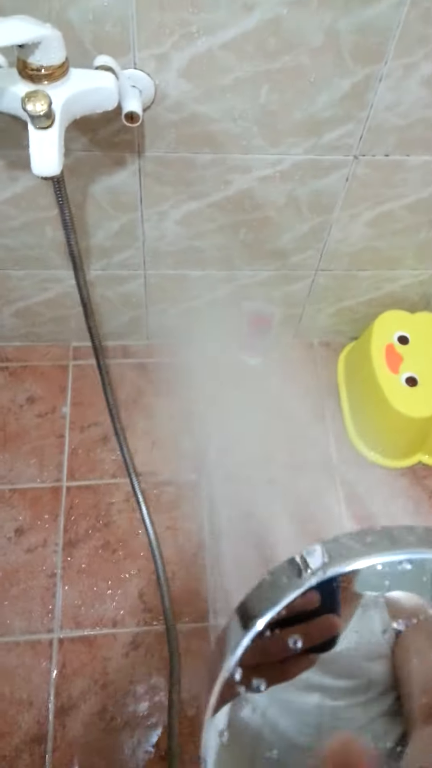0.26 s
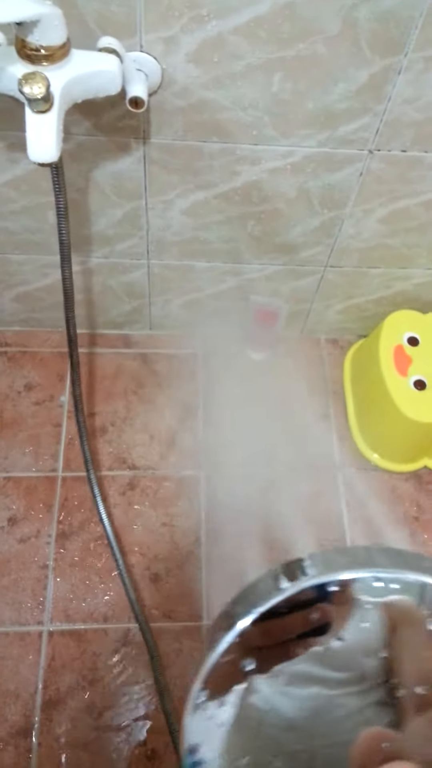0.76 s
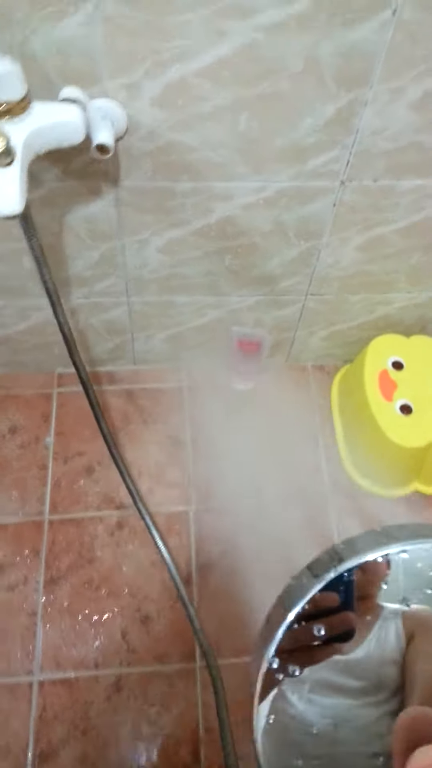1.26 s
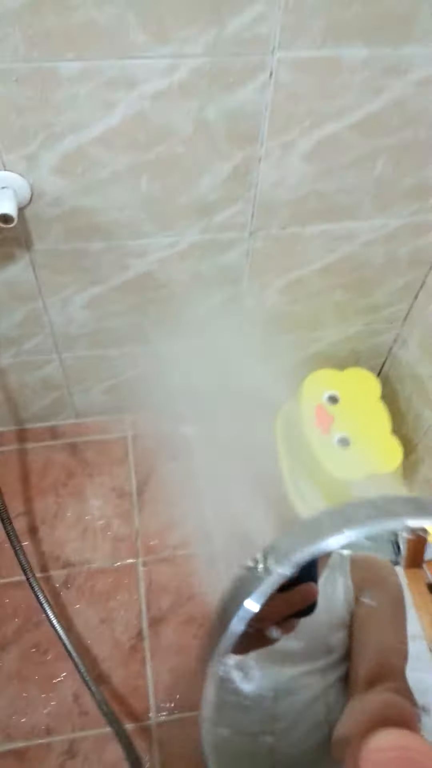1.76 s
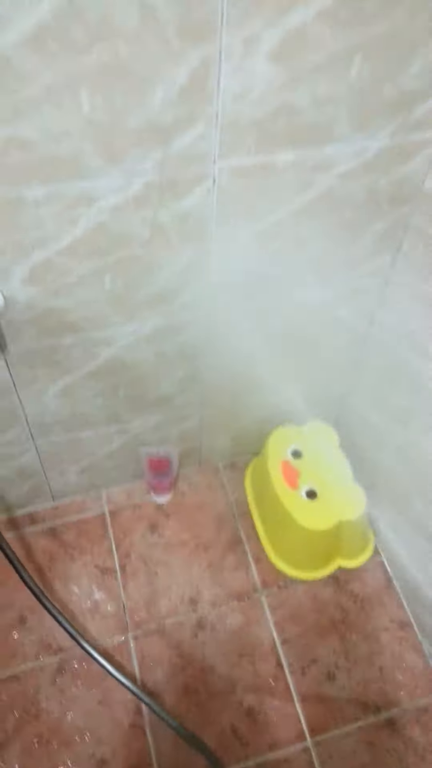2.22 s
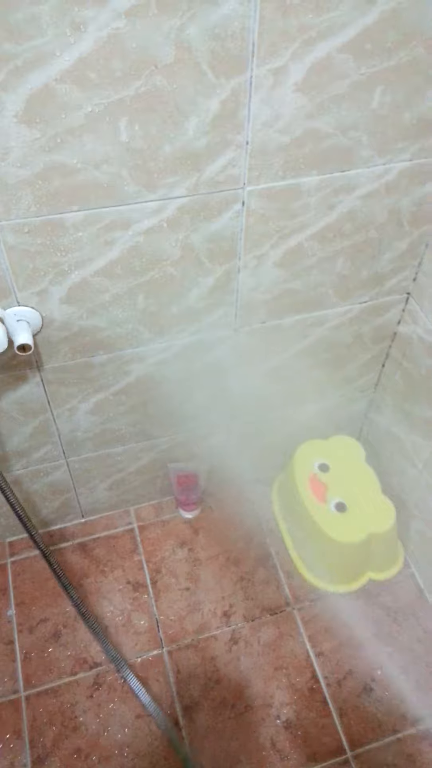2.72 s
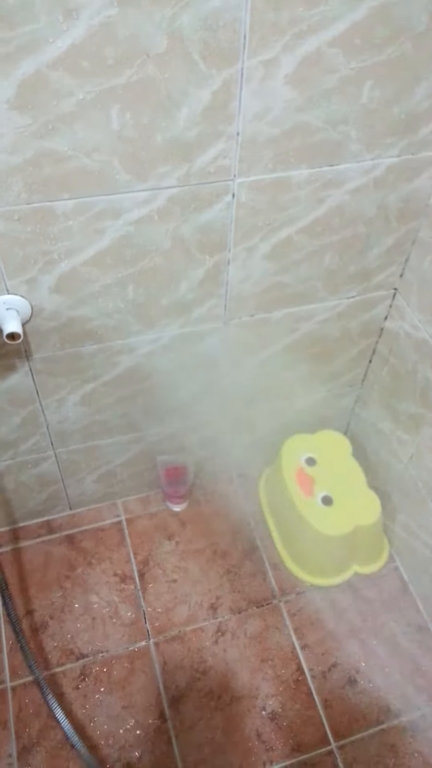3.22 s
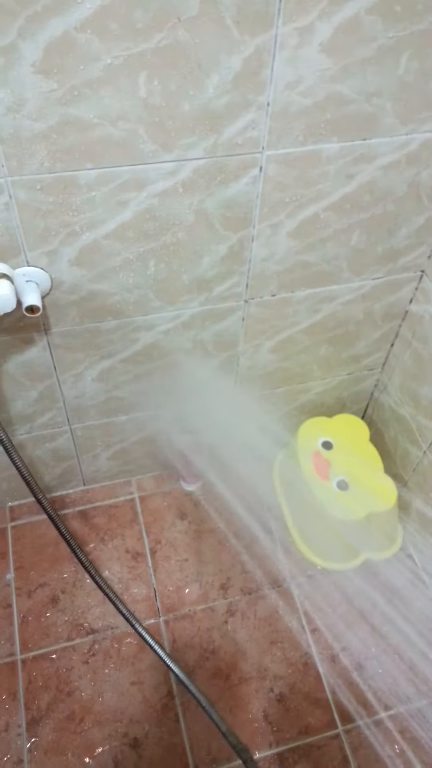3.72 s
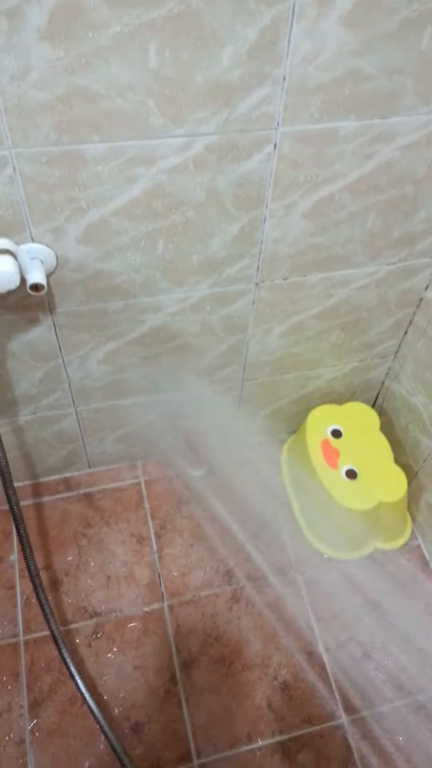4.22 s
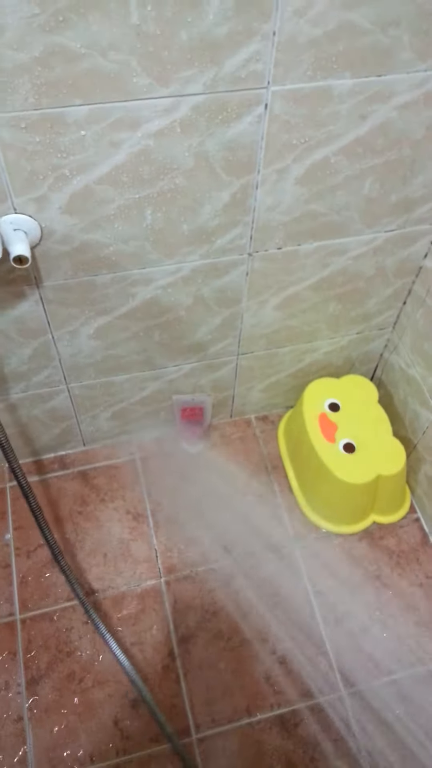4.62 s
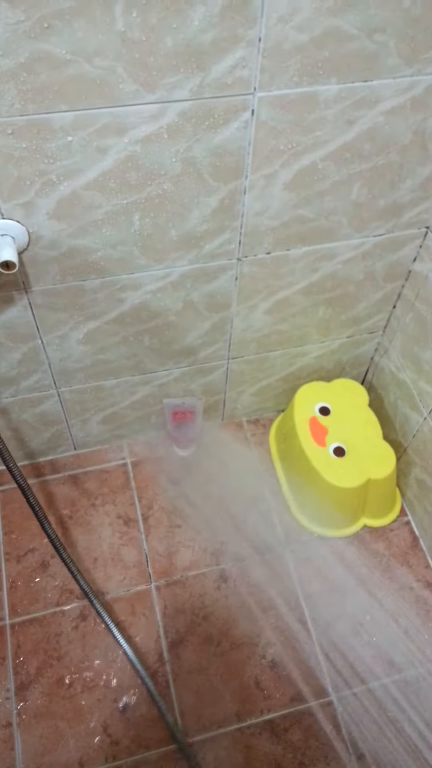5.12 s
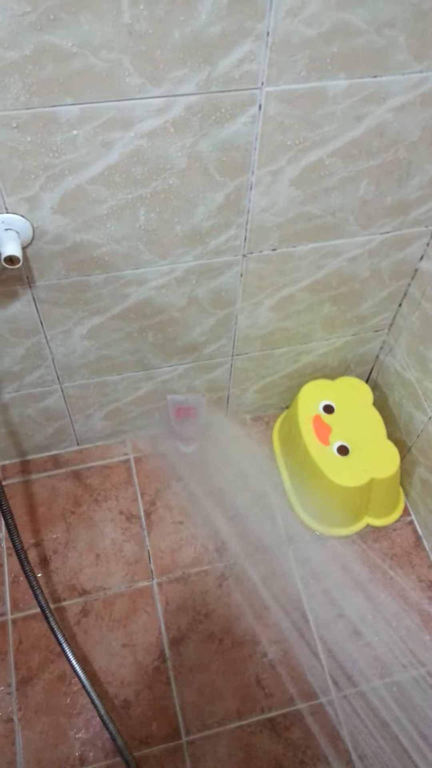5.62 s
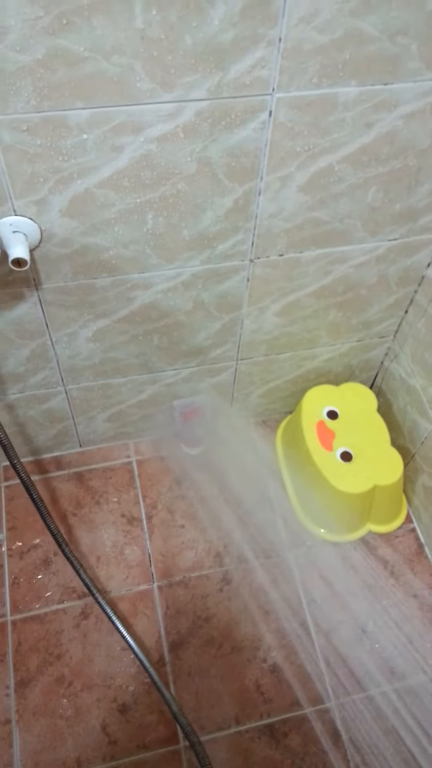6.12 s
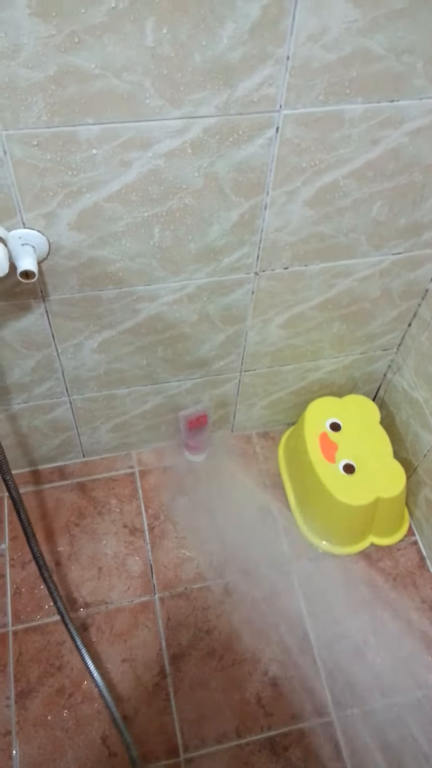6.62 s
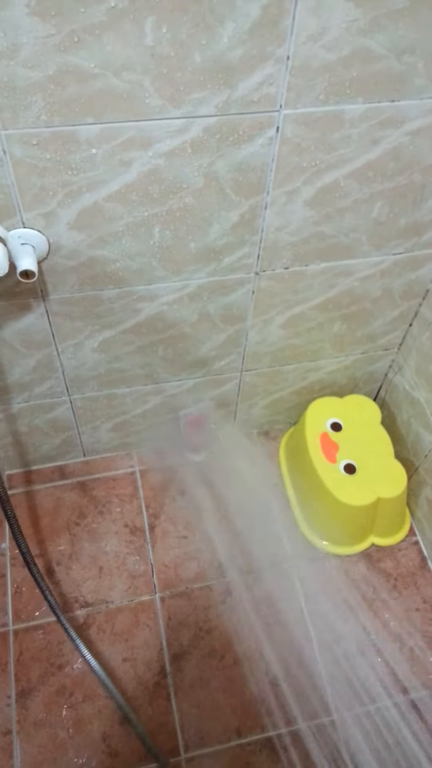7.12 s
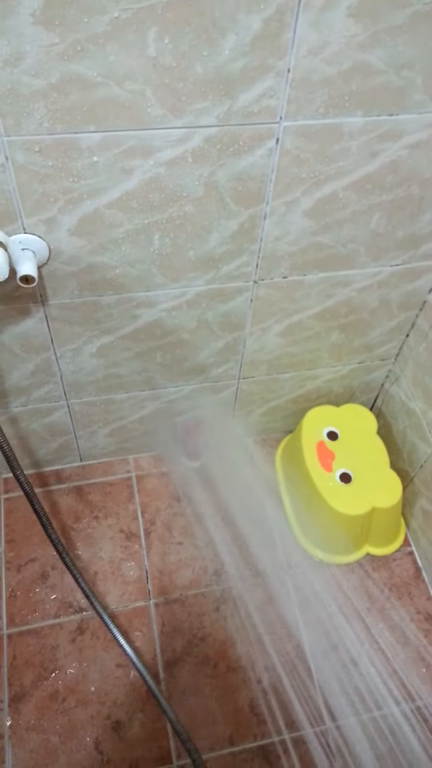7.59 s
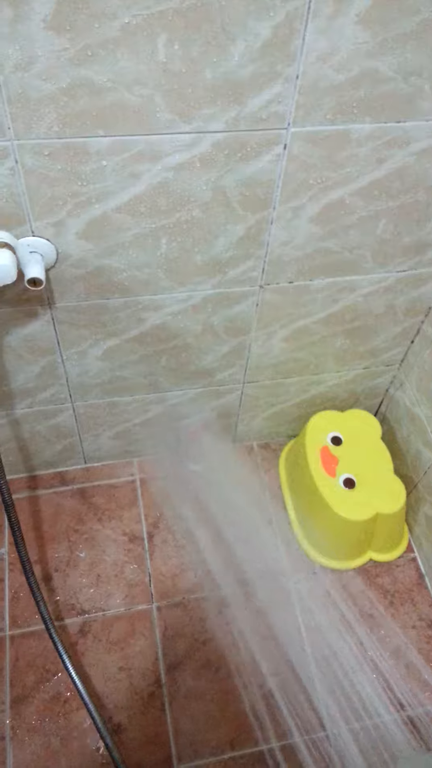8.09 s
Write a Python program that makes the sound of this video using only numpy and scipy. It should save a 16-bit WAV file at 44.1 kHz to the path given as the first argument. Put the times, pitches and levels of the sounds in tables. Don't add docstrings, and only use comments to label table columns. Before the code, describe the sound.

A hand shower hisses over bathroom tile, swelling and dipping, with one very loud sharp plastic snap partway, then a fuller steady spray.

```python
import sys
import numpy as np
from scipy import signal
from scipy.fft import rfft, irfft, next_fast_len
from scipy.io import wavfile
from scipy.ndimage import uniform_filter1d

SR = 44100
rng = np.random.default_rng(int(sys.argv[2]) if len(sys.argv) > 2 else 0)


def persist_wave(psi):
    counts = np.round(np.clip(psi, -1, 1) * 32767).astype(np.int16)
    wavfile.write(sys.argv[1], SR, np.atleast_2d(counts).T)


def natural_amplitude(level_db):
    exponent = np.asarray(level_db, float) / 20
    return 10 ** exponent


N = 368235

# (time [s], splash level [dB], drumming over splash [dB], body over splash [dB],
# fizz over splash [dB], low whistle [dB], high whistle [dB], lean to the left [dB])
SWEEP = [(0.0, -27.5, -6.5, -5, -4, -16, -6, -2.5), (0.11, -29, -6.5, -3, -3.5, -23, 1, -1.5),
         (0.2, -26, -9.5, -6, -5, -33, -11, -1.5), (0.34, -27, -6.5, -5.5, 0.5, -30, -1, -1),
         (0.44, -22.5, -15, -10.5, -4.5, -23.0, -18, -1.5),
         (0.49, -21.5, -12.5, -9.5, -3.0, -15, -10.5, -2), (0.63, -19.5, -15, -10, -5.5, -10, -14, -0.5),
         (0.78, -20, -11.5, -7, -4, -10, -24, -0.5), (0.9, -24.0, -9, -10, -2.5, 0, -14, -1),
         (0.96, -23.5, -15.5, -11.5, -5.5, 1, -13, -1), (1.03, -17, -15.5, -10.5, -6.5, -20, -46, -1.5),
         (1.26, -25.5, -12, -10, -3, 4, -7, 0.0), (1.33, -25.5, -9.5, -6, -4.0, -6, -6, -3),
         (1.4, -18.5, -11.5, -7.5, -5, -12, -14, -0.5), (1.45, -22.5, -10.0, -6, -0.5, -9, -18, -0.5),
         (1.52, -17.5, -10.5, -9.5, -6.5, 5, -2, -1.5), (1.61, -16, -7.5, -4.5, -4.5, -9, -29, -0.5),
         (1.73, -22, -9, -3.5, -7, -9, -15, -1.5), (1.87, -25, -11.5, -7.5, -6, -13, -17, -1.5),
         (2.03, -27.5, -9, -4, -4.5, -13.0, -12, -2), (2.12, -30.5, -6, -1.5, -1.5, -6.0, 8, -2.5),
         (2.22, -27, -7.5, -6.5, -4.5, 9, -6, -2), (2.3, -25, -12.5, -8, -8.5, -2, -2.0, -2),
         (2.36, -28.5, -7, -6, -3, 7, 7, -2), (2.46, -27, -12.5, -5.5, -5, -4, -2, -1),
         (2.62, -25.5, -10, -7.5, -6.5, -5, -2, 0.5), (2.77, -28.5, -8.5, -5, -3, -10, -6, -2.5),
         (3.04, -28.5, -6.5, -4.5, -4, -17, -6, 6), (3.12, -27, -10.5, -7.5, -6.5, -7, -12, -2.5),
         (3.18, -28, -6, -7.5, -3.5, 1.5, 1, 0.5), (3.26, -31, -9.5, -9, -4, 4, 2, -1),
         (3.33, -29, -4, -5, -4, 2.5, -9, 2), (3.66, -34, 3.5, 2, -1, -7, -10, -11),
         (3.76, -29.5, -8, -8.5, -4, -16, -4, 1.0), (3.82, -34, 3, -2.5, -1.5, -10, 2, -0.5),
         (3.92, -34.5, -1, -6.5, 0, -15, -14, 0), (4.02, -31.5, -0.5, -8.5, -4.0, -16, -2, -0.5),
         (4.08, -33, -5.5, -3.5, 0, -14, -4, 0.5), (4.16, -32.0, -3.5, -8, -1.5, -10, -8, 10),
         (4.22, -33, -2, -5.5, 0.5, 12, -9, -1), (4.31, -29.5, -3.5, -4.0, -8.5, -1, -21, -0.5),
         (4.39, -28, -7, -5, -4.0, -1, -7, -1.5), (4.47, -25.5, -10, -9.0, -1.5, 10, -12, -0.5),
         (4.54, -23, -15, -11.5, -6, -6, -9, -1.5), (4.62, -19, -15.5, -11, -3.0, -13, -8.5, -0.5),
         (4.75, -22.5, -12.5, -7.5, -4, -26, -10, -1), (4.87, -27.5, -5.0, -3, -3.5, -8, -14, 0.0),
         (4.93, -21, -8, -7, -5.5, -1, -2, 0.0), (5.05, -22.5, -11.5, -9.5, -7.5, 0, -13.5, -1.5),
         (5.18, -25.5, -9, -6, -4, -5, -13, -1.5), (5.3, -23.5, -13.5, -10, -7, -1, -3, -0.5),
         (5.4, -27.5, -4, -4, -2, -2, -8, -0.5), (5.46, -21.5, -11, -6, -6.5, 0, -11.0, -1),
         (5.68, -24.0, -7.5, -6, -6, -5.0, -6, -0.5), (5.78, -21.5, -10.5, -8.5, -8.5, 2, -18, -1),
         (5.86, -25, -9.5, -5, -3, -8, -8, -0.5), (5.94, -20.5, -10, -7.5, -6.5, 0, -11, -1),
         (6.06, -23, -13, -8.5, -6, -1, -13, 0.0), (6.23, -21.5, -12, -9.5, -10.5, -4, -16, -1),
         (6.36, -25.5, -9, -5, -6, 0, -13, -0.5), (6.47, -24, -8.5, -7, -9.0, 5, 6, -1.5),
         (6.57, -24.0, -11.5, -8.5, -6.0, 1, -26, -1.5), (6.65, -20.5, -18, -10.5, -6.5, -7, -12.0, 0.0),
         (6.75, -26, -13, -13, -4.5, -3, -8, -2), (6.82, -20.5, -13.5, -16.5, -5, -25, -3, -1.0),
         (6.86, -22.5, -12.5, -18.5, -2.5, -23.0, -1, -6), (6.9, -20.5, -16.5, -20.5, -4, -28, -33, -0.5),
         (6.96, -26.5, -12.0, -11, 1, -11, -11, -1), (7.02, -22.5, -14, -7.5, -8, -7, -32, -1.5),
         (7.08, -26, -8.5, -5.5, -4.5, 5, -6, -1.5), (7.23, -21.5, -9.5, -5.5, -4.5, -1, -5, -0.5),
         (7.37, -22.5, -11.5, -10.5, -9, -6, -14, -1.5), (7.52, -25.5, -8, -6.5, -8.5, 0, -5, -1.5),
         (7.76, -25.5, -9, -7.0, -8, -4.5, -11.5, -1), (7.91, -28, -3.5, -5, -7.5, 1, -12, -1),
         (8.04, -28, -7.5, -5.5, -5, 0.0, -2, -1), (8.19, -18.5, -13, -12, -6.5, -5, -21, -1),
         (8.34, -23, -13, -6.5, -7.5, -2.5, -10.0, -2)]
BAND_CORNERS = (600, 1100, 1750, 2600, 4800, 6800)
CORNER_BAND = (0, 1, 1, 2, 2, 3)
# (frequency [Hz], density [dB per Hz])
SPRAY_COLOUR = [(100, -39.5), (300, -17), (450, -12.5), (620, -5.5), (900, -7), (1300, -7), (1870, -6.5),
                (2100, -4.5), (3460, -3), (4900, -6), (5900, -10.5), (9000, -12), (12000, -14),
                (14400, -15)]
# (frequency [Hz], likeness [0 to 1])
LIKENESS = [(200, 0.83), (500, 0.49), (1000, 0.41), (2000, 0.12), (4500, 0.094), (14000, 0.052)]
# (frequency [Hz], share [0 to 1])
FIXED_PATH = [(300, .15), (1500, .1), (4000, .05), (9000, .02)]
# (frequency [Hz], width [Hz], level [dB])
STOOL_RINGING = [(413, 14, 2), (497, 16, 1), (563, 20, 6), (667, 18, 8), (750, 20, 4), (815, 20, 4),
                 (975, 20, 4), (1113, 20, 2)]
# (frequency [Hz], width [Hz], level [dB])
MIST_NOZZLES = [
    [(1438, 25, 5), (2150, 24, 10), (2290, 22, 5)],
    [(2862, 12, 13), (3385, 50, 3), (4273, 22, 4), (5210, 22, 2)],
]
# (frequency [Hz], width [Hz], level [dB])
JET_NOZZLES = [
    [(1395, 20, 1), (2072, 30, 8), (2180, 40, 1), (2335, 40, 2)],
    [(2800, 50, 5), (3375, 50, 6)],
]
# (frequency [Hz], left minus right [dB])
LEFT_OVER_RIGHT = [(60, -2), (180, 2.5), (540, 1.0), (1640, 3), (4940, -0.5), (14900, -2)]
# (time [s], delay of the left microphone [microseconds])
LEFT_DELAY = [(0, 70), (2.3, 90), (2.8, -60), (3.6, -180), (4.3, -160), (4.6, 15), (8.35, 5)]
# (frequency [Hz], level [dB], time to fall 60 dB [s])
SNAP_MODES = [(3450, -8, .015), (7760, -9, .01), (8250, -7, .012), (9370, -3, .018), (9700, -2, .013),
              (10150, -5, .01), (11900, -8, .008), (13400, -4, .012)]
# (frequency [Hz], density [dB per Hz])
CRACK_COLOUR = [(900, -30), (1700, -13), (2500, -7), (5500, -6), (7500, -3), (9500, -1), (12000, -2),
                (14400, -2)]
# (time [s], peak level [dB], pitch of the plastic [Hz])
RING_SLIPS = [
    (3.3539, -17.5, 3400),
    (3.3654, -22, 3590),
    (3.3724, -23, 3600),
    (3.3934, -23.5, 3524),
    (3.4124, -26, 3780),
    (3.4234, -27, 3680),
    (3.5982, -19.5, 3570),
    (3.9964, -35, 3030),
    (4.0075, -24.5, 3690),
]
# (frequency [Hz], time to fall 60 dB [s])
TILE_ECHO = [(500, .5), (2500, .45), (5500, .36), (8000, .33), (14000, .3)]
# (time [s], peak level [dB])
HAND_PUSHES = [
    (6.429, -48),
    (6.999, -50),
]


def spray():
    s, splash_db, drum_db, body_db, fizz_db, low_db, high_db, lean_db = np.transpose(SWEEP)
    near = drops(per_s=9000, spread_db=4.5)
    scattered = evened(0.69 * near + rng.standard_normal((2, N)))
    hz, t, z = frames_of(scattered)
    fixed = np.clip(read(FIXED_PATH, hz), 0, 1)[:, None]
    air_frames = paired(z, hz)
    wide_frames = np.sqrt(1 - fixed) * air_frames + np.sqrt(fixed) * frames_of(room(near[0]))[2]
    wide, air = sound_of(wide_frames)[:, :N], sound_of(air_frames)[:, :N]

    clock = np.arange(N) / SR
    jet = np.clip((clock - 3.47) / 0.49, 0, 1)
    whistle = 0
    for db, mist, jets in zip((low_db, high_db), MIST_NOZZLES, JET_NOZZLES):
        tone = (1 - jet) * resonances(air, mist) + jet * resonances(air, jets)
        whistle = whistle + natural_amplitude(np.interp(clock, s, db)) * tone
    hollow = natural_amplitude(-2.0) * (.3 + .7 * jet) * resonances(air, STOOL_RINGING)
    z = frames_of(wide + whistle + hollow)[2]

    curves = (drum_db, body_db, 0 * s, fizz_db)
    moves = np.array([np.interp(t, s, c - np.mean(c)) for c in curves])
    place = np.interp(np.log(hz + 1), np.log(BAND_CORNERS), CORNER_BAND)
    weights = np.clip(1 - abs(place[:, None] - np.arange(4)), 0, 1)

    patches = uniform_filter1d(rng.standard_normal(z.shape[1:]), size=6, axis=0)
    patches = evened(uniform_filter1d(patches, size=24, axis=1))
    flicker = evened(uniform_filter1d(rng.standard_normal(len(t)), size=10))
    z = z * natural_amplitude(read(SPRAY_COLOUR, hz)[:, None] + 0.74 * patches + 0.62 * flicker)

    delay_s = np.interp(t, *np.transpose(LEFT_DELAY)) / 1e6
    z[0] *= np.exp(-2j * np.pi * hz[:, None] * delay_s)
    splash = (hz > 1900) & (hz < 5500)
    z /= np.sqrt(np.mean(sound_of(z * splash[:, None]) ** 2))
    lean = (np.interp(t, s, lean_db) + read(LEFT_OVER_RIGHT, hz)[:, None]) / 2
    level_db = weights @ moves + np.interp(t, s, splash_db) + np.array([lean, -lean])
    return sound_of(z * natural_amplitude(level_db))[:, :N]


def drops(per_s, spread_db):
    size = natural_amplitude(spread_db * np.minimum(rng.exponential(1, (2, N)), 5))
    size = size * rng.choice([-1, 1], (2, N))
    return evened(size * (rng.random((2, N)) < per_s / SR))


def resonances(x, peaks):
    size = next_fast_len(N)
    hz = np.fft.rfftfreq(size, 1 / SR)
    gain = sum(natural_amplitude(db) / (1 + 2j * (hz - f) / max(width, 10)) for f, width, db in peaks)
    return irfft(rfft(x, size) * gain, size)[:, :N]


def ring_snap():
    out, t = np.zeros((2, N)), np.arange(4000) / SR
    phase = 2 * np.pi * rng.random((len(SNAP_MODES), 2, 1))
    modes = 0
    for (hz, db, t60), p in zip(SNAP_MODES, phase):
        modes = modes + natural_amplitude(db - 60 * t / t60) * np.sin(2 * np.pi * hz * t + p)
    colour = natural_amplitude(read(CRACK_COLOUR, np.fft.rfftfreq(len(t), 1 / SR)))
    hiss = evened(irfft(rfft(rng.standard_normal((2, len(t)))) * colour))
    crack = natural_amplitude(5 - 60 * t / .014) * hiss
    onset = np.minimum(t / 0.00017, 1)
    snap_s, snap_db = 3.4738, 4.5
    out[:, round(snap_s * SR):][:, :len(t)] = natural_amplitude(snap_db) * (modes + crack) * onset / 2
    return out


def ring_creaks():
    out, t = np.zeros(N), np.arange(1500) / SR
    swell = t / .003 * np.exp(1 - t / .003)
    for s, db, hz in RING_SLIPS:
        grit = uniform_filter1d(rng.standard_normal((2, len(t))), size=20)
        squeak = (1 + 2 * grit[0]) * np.sin(2 * np.pi * hz * t + 3 * grit[1])
        out[round(s * SR):][:len(t)] += natural_amplitude(db) * swell * squeak
    return out


def room(x):
    taps = np.zeros((2, SR // 2))
    jitter = rng.integers(0, 20, (2, (SR // 2 - 121) // 20))
    at = np.arange(120, SR // 2 - 20, 20) + jitter
    np.put_along_axis(taps, at, rng.choice([-1., 1.], at.shape), 1)
    hz, t, z = frames_of(taps)
    fade = natural_amplitude(-60 * t / read(TILE_ECHO, hz)[:, None])
    tail = sound_of(paired(z, hz) * fade)
    return signal.fftconvolve(x[None], tail / np.linalg.norm(tail[0]), axes=1)[:, :N]


def handling():
    rumble = uniform_filter1d(rng.standard_normal((2, N)), size=150)
    out, t = natural_amplitude(-86.0) * evened(rumble), np.arange(400) / SR
    push = np.sin(2 * np.pi * 140 * t) * np.hanning(len(t))
    for s, db in HAND_PUSHES:
        out[:, round(s * SR):][:, :len(t)] += natural_amplitude(db) * np.array([[1.5], [-.4]]) * push
    return out


def bass_gate(x, under_db):
    shape = dict(fs=SR, window="cosine", nperseg=2048, noverlap=1024)
    hz, t, z = signal.stft(x, **shape)
    step = natural_amplitude(under_db) * np.sqrt(np.mean(abs(z) ** 2, axis=1, keepdims=True))
    kept = (abs(z) > step) | (hz > 430)[:, None]
    return signal.istft(z * np.where(kept, 1, natural_amplitude(-24.0)), **shape)[1][:, :N]


def paired(z, hz):
    same = np.clip(read(LIKENESS, hz), -1, 1)[:, None]
    return np.array([z[0], same * z[0] + np.sqrt(1 - same ** 2) * z[1]])


def evened(x):
    return x / np.sqrt(np.mean(x ** 2) + 1e-20)


def read(points, hz):
    f, value = np.transpose(points)
    return np.interp(np.log(hz + 1), np.log(f + 1), value)


def frames_of(x):
    return signal.stft(x, SR, nperseg=512, noverlap=384)


def sound_of(z):
    return signal.istft(z, SR, nperseg=512, noverlap=384)[1]


def scene():
    snap, creaks = ring_snap(), ring_creaks()
    echo = room(natural_amplitude(1.5) * snap[0] + natural_amplitude(-6.0) * creaks)
    return spray() + snap + creaks + echo


def band_limit(x):
    return signal.sosfilt(signal.butter(12, 15490, fs=SR, output="sos"), x)


def record(dry):
    thin = signal.sosfilt(signal.butter(2, 250, "highpass", fs=SR, output="sos"), dry)
    treble_limit = signal.firwin(1023, 14490, window=("kaiser", 9), fs=SR)
    cut = signal.oaconvolve(thin, treble_limit[None], "same")
    mix = np.clip(bass_gate(cut, under_db=-8.0) + handling(), -1, 1)
    return band_limit(mix)


dry = scene()
out = record(dry)
persist_wave(out)
```